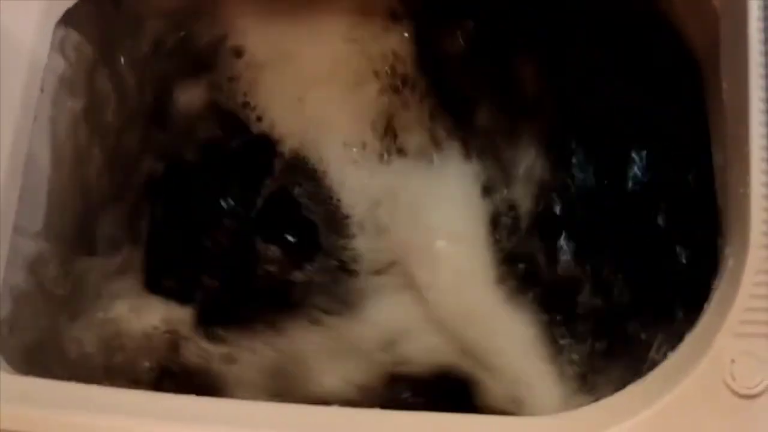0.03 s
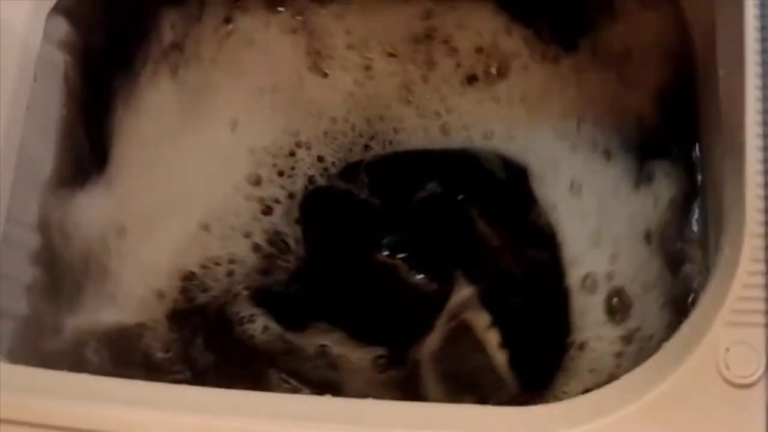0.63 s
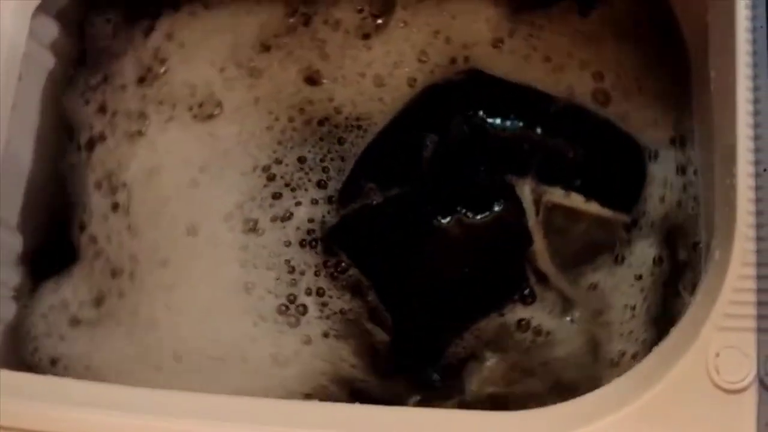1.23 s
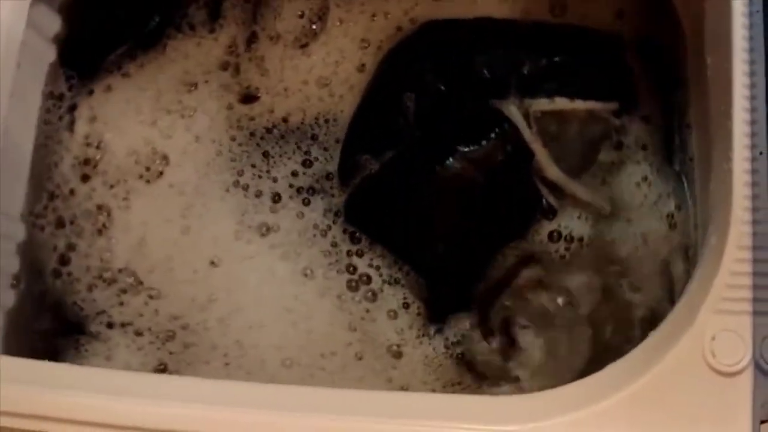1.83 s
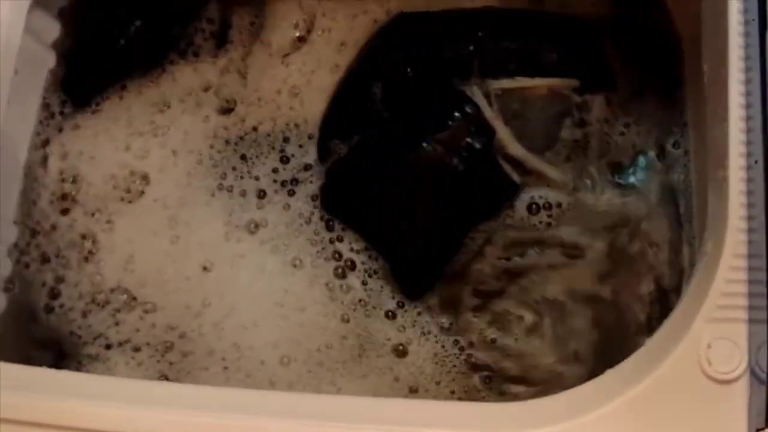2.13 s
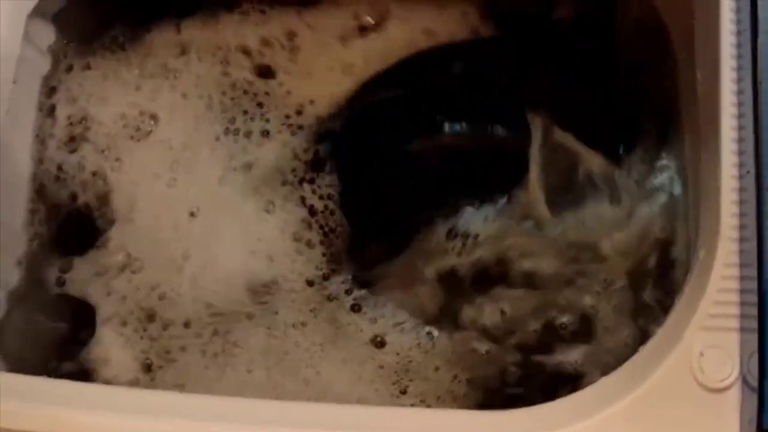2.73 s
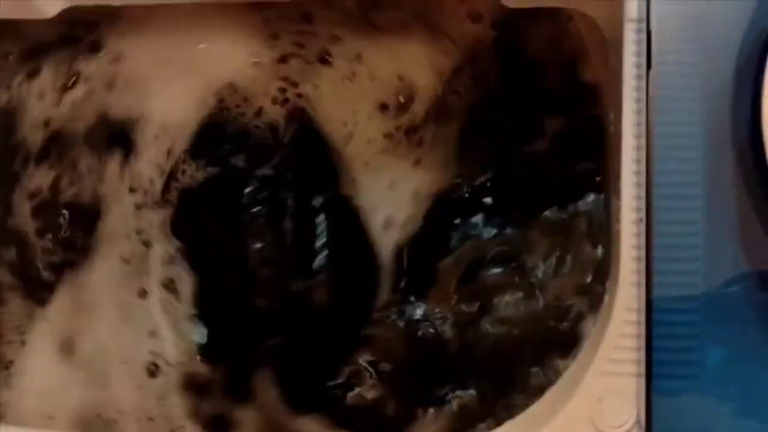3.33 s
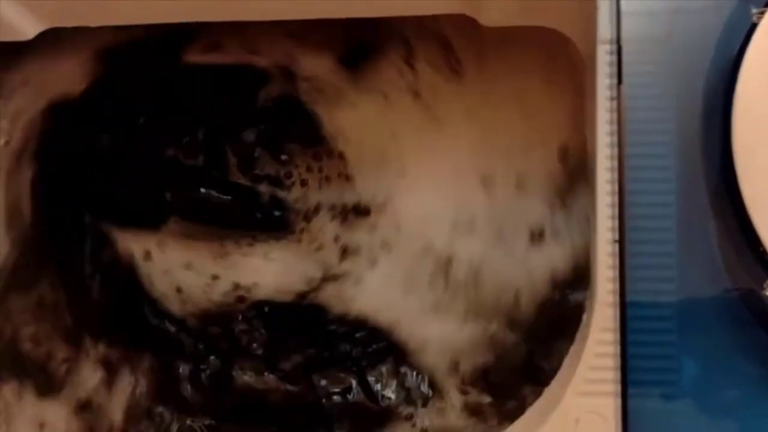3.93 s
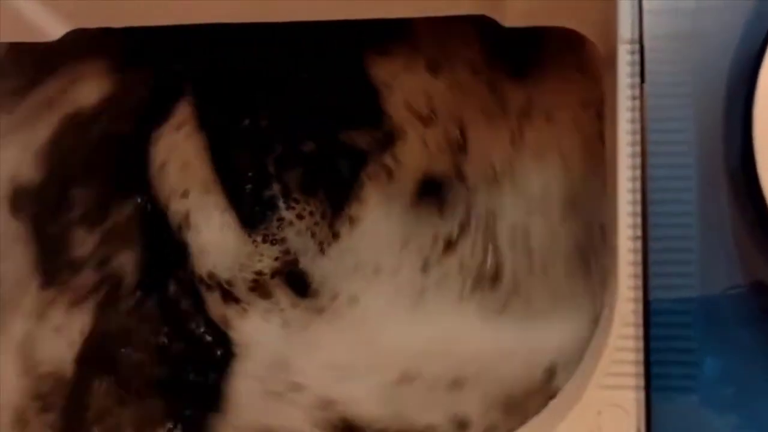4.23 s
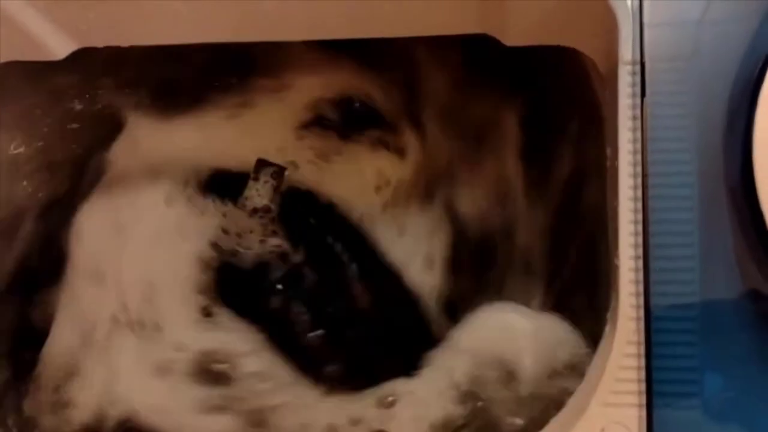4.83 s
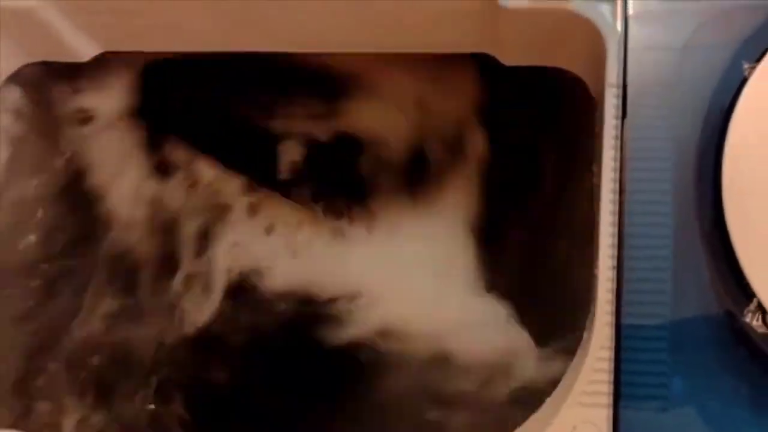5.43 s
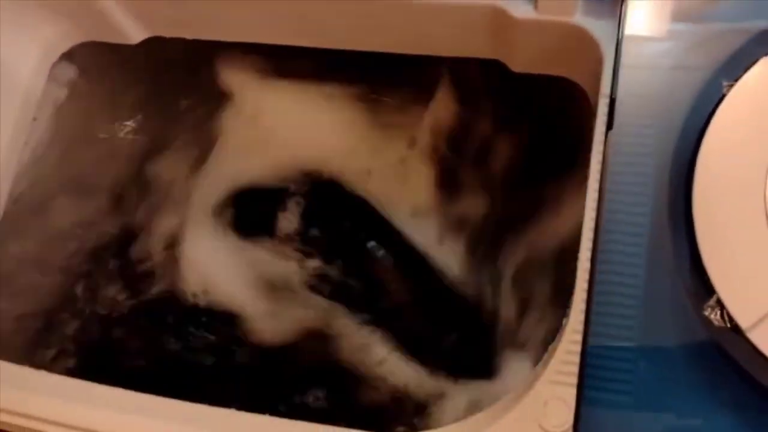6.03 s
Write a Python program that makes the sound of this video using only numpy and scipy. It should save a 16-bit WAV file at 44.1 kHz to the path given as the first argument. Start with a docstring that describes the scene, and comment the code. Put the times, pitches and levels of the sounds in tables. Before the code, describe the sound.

After a click, a washing machine motor starts humming over a fluttering whirr as laundry sloshes, drips and splashes in the tub.

```python
"""A twin tub washing machine's motor hums at twice mains frequency, heard just above the open wash tub.
A shaft, probably the spin tub's, whirrs throughout and rubs twice a turn. The timer clicks, the motor
starts with a shudder and the pulsator churns laundry in sudsy water. A sharp double clack and a faint
high squeak follow. The water drips and splashes, most of all near the end."""
import sys
import numpy as np
from scipy import signal
from scipy.fft import rfft, irfft, next_fast_len
from scipy.io import wavfile
from scipy.ndimage import map_coordinates

SR = 44100
rng = np.random.default_rng(int(sys.argv[2]) if len(sys.argv) > 2 else 0)


def dump_mix(stems):
    """Bounce the given channels to the path in sys.argv[1] as a 16-bit WAV at rate SR."""
    frames = np.atleast_2d(stems).T  # one column per channel
    limited = np.clip(frames, -1, 1)  # hard clip at full scale
    pcm = np.round(limited * 32767).astype(np.int16)
    wavfile.write(sys.argv[1], SR, pcm)


N = 268965

SWITCH_S, START_S = 1.5275, 1.596  # timer closes; motor turns
PULL_IN_S, SWIRL_S = .038, 2.2  # motor takes hold; water reaches full swirl
PAN = np.array([[.5], [-.5]])  # splits a left-minus-right difference
# Bright spectrum of spray, drip echo and timer snap: freq_hz, density_db
SPRAY_SPECTRUM = [(1500, -15), (2800, 0.5), (4000, 0.5), (5500, -8.5), (8000, -8), (11000, -12.5),
                  (15000, -16.5)]


def amp(db):
    """Decibels to gain."""
    return 10 ** (np.asarray(db) / 20)


def unit(x):
    """x at rms 1."""
    return x / np.sqrt(np.mean(x ** 2) + 1e-20)


def clock():
    """Sample times in seconds."""
    return np.arange(N) / SR


def ramp(start_s, length_s):
    """Linear rise from 0 to 1."""
    return np.clip((clock() - start_s) / length_s, 0, 1)


def flanks(top_s, rise_s, fall_s):
    """Distance from top_s, in rise times before it and fall times after."""
    return np.maximum((top_s - clock()) / rise_s, (clock() - top_s) / fall_s)


def burst(start_s, attack_s, t60_s):
    """Envelope with exponential attack and decay."""
    age_s = np.maximum(clock() - start_s, 0)
    return (1 - np.exp(-age_s / attack_s)) * amp(-60 * np.minimum(age_s / t60_s, 3))


def wobble(rate_hz):
    """Smooth random curve with knots at rate_hz."""
    knots = rng.standard_normal(int(N * rate_hz / SR) + 4)
    return map_coordinates(knots, [clock() * rate_hz], mode="nearest")


def noise():
    """Two independent white noises."""
    return rng.standard_normal((2, N))


def sine(hz):
    """Sine following a per-sample frequency."""
    return np.sin(2 * np.pi * np.cumsum(hz, axis=-1) / SR)


def along(points, hz):
    """(freq_hz, value) points read on a log axis."""
    freq_hz, values = np.transpose(points)
    return np.interp(np.log(hz + 1), np.log(freq_hz), values)


def filtered(x, response):
    """x through a complex frequency response."""
    size = next_fast_len(N + SR // 2)
    return irfft(rfft(x, size) * response(np.fft.rfftfreq(size, 1 / SR)), size)[..., :N]


def coloured(x, spectrum):
    """x shaped by (freq_hz, density_db) points, at rms 1."""
    return unit(filtered(x, lambda hz: amp(along(spectrum, hz))))


def resonate(x, modes):
    """x through steep-skirted (freq_hz, width_hz, gain_db) resonances, at rms 1."""
    def mode(hz, centre_hz, width_hz, db):
        damping = 2j * hz * width_hz
        return amp(db) * (damping / (centre_hz ** 2 - hz ** 2 + damping)) ** 2

    return unit(filtered(x, lambda hz: sum(mode(hz, *row) for row in modes)))


def bubbles(count, pitch_hz, log_spread, decay_cycles, size_db, samples=600):
    """Randomly timed stereo bubbles, each a damped sine rising in pitch."""
    when, pitch, size, pan = np.hsplit(rng.random((count, 4)), 4)
    hz = np.minimum(pitch_hz * np.exp(log_spread * (2 * pitch - 1)), SR / 3)
    cycles = hz * np.arange(samples) / SR
    life = cycles / decay_cycles
    gain = amp(-size_db * np.log(np.maximum(size, .01)))
    ring = gain * np.exp(-life) * np.sin(2 * np.pi * cycles * (1 + np.minimum(life, 2) / 20))
    index = (when * N).astype(int) + np.arange(samples)
    sides = np.cos(2 * np.pi * pan), np.sin(2 * np.pi * pan)
    return unit(np.array([np.bincount(index.ravel(), (ring * side).ravel(), N)[:N] for side in sides]))


def drum():
    """The turning drum rumbles and stirs a thin hiss of air."""
    # Rumble and air spectra: freq_hz, density_db
    rumble = [(25, -50.5), (50, -33), (75, -13), (102, 4.5), (125, 0), (145, 5), (185, -6.5), (215, 4.5),
              (265, -14.5), (335, -1.5), (390, -8), (450, -13), (800, -13.5), (2000, -60)]
    air = [(400, 13.5), (2500, 21), (3200, 8), (3800, 4.5), (4200, 4), (5500, -4.5), (7000, -6.5),
           (10500, -15), (13000, -28)]
    return amp(-46.5) * coloured(noise(), rumble) + amp(-55.5) * coloured(noise(), air)


def shaft():
    """A bent shaft rubs twice a turn, once harder: it scrapes, ticks, squeals, and chirps while binding."""
    # Shaft speed: time_s, turns_per_s
    speed = [(0.0, 17.34), (0.3, 18.96), (1.1, 19.1), (1.2, 21.31), (1.4, 18.98), (1.9, 20.13),
             (2.1, 19.55), (2.7, 19.74), (2.8, 18.78), (3.4, 20.44), (3.5, 18.54), (4.0, 20.44),
             (4.2, 19.12), (4.8, 19.28), (5.0, 18.74), (5.5, 20.02), (5.7, 17.54), (6.1, 17.78)]
    # Scrape spectrum: freq_hz, density_db
    whirr = [(450, -1.5), (620, 2.5), (900, -1), (1050, -5), (1200, 0), (1380, -10.5), (1680, 1),
             (1980, -9), (2200, -4.5), (2520, -11.5), (2800, -2.5), (3050, -15.5), (3400, -22),
             (5000, -31.5), (8000, -65)]
    # Cabinet and bearing resonances: freq_hz, width_hz, gain_db
    cabinet_modes = [(729, 16, 6), (926, 14, 2), (1297, 14, 6), (1447, 12, 2), (1635, 25, -1),
                     (1897, 22, -3), (2110, 25, -3), (2500, 20, -3.5), (2590, 70, -8), (3045, 20, -16),
                     (3150, 12, -16)]
    bearing_modes = [(1706, 30, 0), (2348, 17, 4), (2680, 70, -9), (3290, 100, -18.5), (3510, 31, -17)]
    turns = np.cumsum(np.interp(clock(), *np.transpose(speed))) / SR
    driven = ramp(START_S, PULL_IN_S)
    binding = ramp(2.78, .45) - ramp(5.35, .45)

    def contact(angle_turns, width_turns):
        """Pressure around one shaft angle."""
        return np.exp(-(((turns - angle_turns + .5) % 1 - .5) / width_turns) ** 2)

    def tone(hz):
        """Unsteady friction tone and its weaker, unrelated reflection."""
        return np.array([[1], [.55]]) * sine(hz + 22 * np.array([wobble(70), wobble(70)]))

    second_rub = .4 + .35 * ramp(1, .8)
    rubs = contact(.72, .15) + .25 * contact(.92, .1) + second_rub * contact(.17, .12)
    pressure = unit((.27 + rubs) * amp(.6 * wobble(20)))
    touch = unit((contact(.7, .085) + second_rub * contact(.17, .08)) * amp(1.3 * wobble(30)))
    release = unit((.2 + contact(.86, .13)) * amp(1.5 * wobble(20)))
    grip = unit((.18 + contact(.75, .13) + .76 * contact(.22, .12)) * amp(.4 * wobble(40)))
    mid_side = np.array([[1], [.75]])
    scrape = amp(-55.5) * coloured(pressure * noise(), whirr)
    cabinet = amp(-56) * resonate(mid_side * noise(), cabinet_modes) * pressure ** .5
    tick = amp(-61 - 10.5 * binding) * touch * tone(hz=2596)
    catch = amp(-48) * burst(.888, .001, .083)  # one rub catches and squeals louder
    squeal = (amp(-58 - 4.5 * driven) * release + catch) * tone(hz=2250)
    soft_release = unit(contact(.86, .13) * amp(4 * wobble(12)))
    squeal += amp(-59.5 - 4.5 * driven) * soft_release * tone(hz=2135)
    chirp = amp(-52) * tone(hz=2395) + amp(-58.5) * resonate(mid_side * noise(), bearing_modes)
    return amp(1.5 * driven) * (scrape + cabinet + tick) + squeal + binding * grip * chirp


def water():
    """Waves slosh and fold the crackling foam over; once driven, the load churns and gurgles."""
    # Wave crests: crest_s, fizz_db, slosh_db
    waves = [(0.03, -65.5, -56), (2.76, -70.5, -63.5), (4.169, -82.5, -67.5), (5.06, -70.5, -64),
             (5.521, -79.5, -62), (6.059, -69, -47.5)]
    # Load, water and foam spectra: freq_hz, density_db
    churn_spectrum = [(25, -12), (55, -10.5), (75, 0.5), (115, 9), (150, 6.5), (180, 2), (215, -4),
                      (265, -9.5), (310, -1.5), (385, 0), (440, -11.5), (650, -59)]
    slosh_spectrum = [(90, -63), (250, -26.5), (420, -9.5), (510, -0.5), (580, -3.5), (760, -6),
                      (1000, -6.5), (1500, -26.5), (3000, -75), (6000, -75.5)]
    fizz_spectrum = [(1200, -19.5), (2500, -9.5), (4100, -2.5), (5200, 1), (7000, -1.5), (9500, -0.5),
                     (13000, -1), (15000, -8)]
    wave_slosh = sum(amp(db) * np.exp(-flanks(s, .054, .14)) for s, _, db in waves)
    wave_fizz = sum(amp(db) * np.exp(-flanks(s, .18, .18)) for s, db, _ in waves)
    driven = ramp(1.53, .11)
    churn_db = -41 + 1.5 * ramp(START_S, SWIRL_S) + .37 * wobble(13)
    churn = driven * amp(churn_db) * coloured(noise(), churn_spectrum)
    gurgle = bubbles(count=1500, pitch_hz=650, log_spread=.5, decay_cycles=4.5, size_db=1.5, samples=1200)
    slosh = (driven * amp(-55) + wave_slosh) * coloured(noise() + .15 * gurgle, slosh_spectrum)
    crackle = bubbles(count=2500, pitch_hz=6000, log_spread=.5, decay_cycles=2, size_db=1.8, samples=150)
    fizz = (amp(-95.5) + wave_fizz) * amp(wobble(12)) * coloured(noise() + .7 * crackle, fizz_spectrum)
    return churn + slosh + fizz


def splashes():
    """Crests break into droplet spray over a soft slap; a few big bubbles plop."""
    # Breaking crests: start_s, level_db, slap_offset_db
    crests = [(0.041, -44, 9), (0.085, -43.5, -1), (0.138, -55.5, 13.5), (0.997, -50, -13), (4.115, -52, 4),
              (5.129, -44, -8), (5.165, -45.5, 10.5), (5.476, -45, 5), (5.66, -47, -5.5),
              (5.871, -40.5, 10.5), (5.94, -52, 5), (6.034, -38.5, 6.5), (6.061, -47, 1)]
    # Slap spectrum: freq_hz, density_db
    slap_spectrum = [(150, -69), (700, 1), (2200, 5), (3000, -9), (5000, -23), (9000, -54)]
    # Big bubbles: start_s, pitch_hz, level_db
    plops = [(5.498, 1170, -38.5), (5.678, 2020, -33.5), (5.873, 1970, -33), (5.89, 2140, -35.5),
             (6.03, 797, -37), (6.05, 600, -29), (6.075, 690, -34)]
    spray = sum(amp(db - 13) * burst(s - .003, .0046, .27) for s, db, _ in crests)
    slap = sum(amp(db + offset_db - 7.5) * burst(s, .018, .2) for s, db, offset_db in crests)
    droplets = bubbles(count=16000, pitch_hz=5500, log_spread=.8, decay_cycles=5, size_db=2, samples=200)
    droplets += .7 * noise()
    pockets = bubbles(count=7000, pitch_hz=1700, log_spread=.8, decay_cycles=5, size_db=2) + .6 * noise()
    out = spray * coloured(droplets, SPRAY_SPECTRUM) + slap * coloured(pockets, slap_spectrum)
    for start_s, hz, db in plops:
        out[0] += amp(db) * burst(start_s, .0032, .073) * sine(hz * (1 + .04 * wobble(700)))
    return out


def drips():
    """Drops ring on the water and echo in the tub; the tiniest tick dryly on the wall."""
    # Drops on water: start_s, pitch_hz, level_db
    drops = [(0.297, 3620, -56), (0.997, 3700, -56), (1.0104, 4200, -57), (1.194, 4340, -58),
             (4.17, 3700, -56), (4.333, 3600, -54), (4.351, 3600, -57), (4.433, 3600, -57.5),
             (5.04, 4100, -53), (5.0615, 3800, -46.5), (5.173, 3950, -43.5)]
    # Droplets on the wall: start_s, level_db
    spats = [(0.089, -55.5), (4.865, -68), (4.931, -63), (5.387, -58.5), (5.985, -57.5), (6.032, -58.5)]
    # Wall tick spectrum: freq_hz, density_db
    spat_spectrum = [(2500, -20), (5000, -3.5), (9000, 2), (11500, -4), (14000, -11.5)]
    out = np.zeros((2, N))
    echo = coloured(noise(), SPRAY_SPECTRUM)
    for start_s, hz, db in drops:
        waver = 1 + .06 * np.array([wobble(900), wobble(900)])
        ring = burst(start_s, .0007, t60_s=.035) * sine(hz * waver)
        out += amp(db) * (ring + amp(-15.5) * burst(start_s, .001, t60_s=.06) * echo)
    ticks = sum(amp(db) * burst(s, .0005, t60_s=.025) for s, db in spats)
    return out + ticks * coloured(noise(), spat_spectrum)


def timer():
    """The contact snaps in its plastic housing; the panel thumps under it."""
    # Housing and panel resonances: freq_hz, width_hz, gain_db
    housing_modes = [(2880, 110, 9), (4360, 170, -1), (6440, 320, -2.5), (7280, 330, -2.5),
                     (10900, 1100, -16.5), (13400, 450, -16)]
    panel_modes = [(226, 42, 3.5), (360, 34, -2), (935, 95, -12), (1940, 190, -16)]
    snap = 1.6 * burst(SWITCH_S, .0004, t60_s=.06) + .5 * burst(SWITCH_S, .003, t60_s=.37)
    knock = burst(SWITCH_S, .001, t60_s=.34)
    housing = unit(resonate(noise(), housing_modes) + .49 * coloured(noise(), SPRAY_SPECTRUM))
    return amp(-49) * snap * housing + amp(-36.5) * knock * resonate(noise(), panel_modes)


def wash_motor():
    """The stator pulls twice a mains cycle; the cabinet adds overtones that shake with the load."""
    hum_hz, run_up_s = 120.66, .51
    swirl = ramp(START_S, SWIRL_S)
    fade_db = 6.5 * np.maximum(clock() - 5.59, 0)  # the listener draws back
    hum_db = -23.5 + 4 * ramp(START_S, run_up_s) - fade_db
    buzz_db = -41 + 6.5 * swirl - fade_db
    turning = (1 - np.exp(-np.maximum(clock() - START_S, 0) / PULL_IN_S)) ** 2
    stalled = (1 - turning) * amp(-22.5) * ramp(SWITCH_S, PULL_IN_S)
    phase = 2 * np.pi * hum_hz * clock()

    def partial(order, db, pan_db, shake, wave):
        """One harmonic, unsteady in level and phase."""
        line = (1 + shake * wobble(30)) * wave(order * phase + shake * wobble(30))
        return np.sqrt(2) * amp(db + pan_db * PAN) * line

    hum = partial(1, hum_db, pan_db=-.25, shake=.025, wave=np.cos)
    hum += partial(2, hum_db - 20.7 - 2.4 * swirl, pan_db=.5, shake=.12, wave=np.cos)
    # near resonance the cabinet wall lags by a quarter cycle
    hum += partial(3, buzz_db, pan_db=-6, shake=.038, wave=np.sin)
    hum += partial(4, hum_db - 27 - 3 * swirl, pan_db=4.5, shake=.11, wave=np.sin)
    return (turning + stalled) * hum


def shudder():
    """The drive jolts the cabinet as it takes up the load."""
    # Jolt spectrum: freq_hz, density_db
    jolt = [(120, -14.5), (330, -8.5), (620, -2), (950, -8), (1300, -14.5), (2500, -21.5), (4000, -56.5)]
    take_up = np.exp(-flanks(top_s=1.63, rise_s=.024, fall_s=.052))
    return amp(-38.5) * take_up * coloured(noise(), jolt)


def clacks():
    """Something hard, perhaps a fastener, hits the tub twice: crack, shell knock and metallic ring."""
    # Impacts: start_s, crack_db, knock_db, ring_db
    hits = [(2.592, -38.5, -34, -40.5), (2.6021, -45, -39, -41)]
    # Crack and knock spectra: freq_hz, density_db
    crack_spectrum = [(600, -0.5), (2300, 0.5), (2800, 3.5), (3500, -13), (4300, -7), (5400, -16.5),
                      (6500, -13), (9000, -21.5), (12500, -29), (13900, -12.5), (15000, -28)]
    knock_spectrum = [(100, -12), (300, -5.5), (410, 10.5), (600, -6), (780, -1), (1050, -7), (1600, -12),
                      (2400, -8), (4000, -31.5)]
    # Steel modes: freq_hz, gain_db, t60_s
    steel_modes = [(2245, 0.5, 0.12), (2330, -2, 0.1), (2770, -3, .08), (4200, -10.5, 0.21),
                   (4330, -13, .12), (6100, -18, 0.098), (6993, -16, .12), (8350, -24, .11),
                   (9990, -23.5, .1)]
    crack, knock = coloured(noise(), crack_spectrum), coloured(noise(), knock_spectrum)
    out = np.zeros((2, N))
    age_s = np.arange(SR // 3) / SR
    attack = 1 - np.exp(-age_s / .001)
    for start_s, crack_db, knock_db, ring_db in hits:
        out += amp(crack_db) * burst(start_s, .0008, t60_s=.07) * crack
        out += amp(knock_db) * burst(start_s, .001, t60_s=.15) * knock
        for hz, mode_db, t60_s in steel_modes:
            drift_rad = np.cumsum(rng.normal(0, .06, (2, len(age_s))), axis=1)
            phase = 2 * np.pi * (hz * age_s + rng.random((2, 1))) + drift_rad
            ring = attack * amp(ring_db + mode_db - 60 * age_s / t60_s) * np.sin(phase)
            out[:, round(start_s * SR):][:, :len(age_s)] += ring
    return out


def squeak():
    """A faint, very high squeak arches in pitch and level inside a breathy swish."""
    away = np.minimum(flanks(top_s=2.88, rise_s=.22, fall_s=.13), 1)
    pitch_hz = 13450 - 1900 * away ** 2
    envelope = (1 - away ** 8) * amp(-71.5 - 15 * away)
    whistle = (1 + .3 * wobble(120)) * sine(pitch_hz + 90 * wobble(1500))
    swish = wobble(2400) * sine(pitch_hz + 500 * wobble(3000))
    return envelope * (whistle + amp(1.5) * swish)


def in_tub(mid_side):
    """Tub reflections turn two unrelated signals into a partly alike left and right."""
    # Left-right likeness: freq_hz, correlation
    likeness = [(130, 0.97), (300, 0.96), (640, 0.35), (1400, 0.25), (2500, 0.26), (4000, 0.048),
                (7000, 0.25), (12000, 0.94)]
    # Level balance: freq_hz, left_minus_right_db
    balance = [(100, 0), (500, -0.5), (1300, 0), (1900, 0), (2400, -5), (4400, -2), (8000, 0.5)]
    # Phase difference: freq_hz, left_lead_rad
    lead = [(100, 0.21), (430, 0.29), (780, 0.8), (1300, 1.3), (1750, 1.4), (2400, 1.5), (3000, 0.1),
            (6000, 0.3)]

    def blend(hz):
        angle = np.arccos(np.clip(along(likeness, hz), 0, 1)) / 2
        return np.array([np.cos(angle), np.sin(angle)])

    def placement(hz):
        return amp(PAN * along(balance, hz)) * np.exp(1j * PAN * along(lead, hz))

    mid, side = filtered(mid_side, blend)
    return filtered(np.array([mid + side, mid - side]), placement)


def scene():
    """Hum and squeak arrive directly; the rest comes through the tub."""
    direct = wash_motor() + squeak()
    inside = drum() + shaft() + water() + splashes() + drips() + timer() + clacks() + shudder()
    return direct + in_tub(inside)


def record(dry):
    """Steep low-pass band limit."""
    cutoff_hz = 15150
    return signal.sosfilt(signal.ellip(10, .1, 90, cutoff_hz, fs=SR, output="sos"), dry)


dry = scene()
out = record(dry)
dump_mix(out)
```